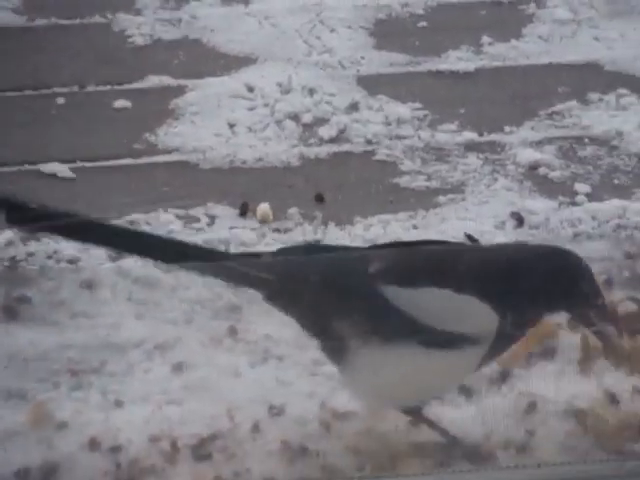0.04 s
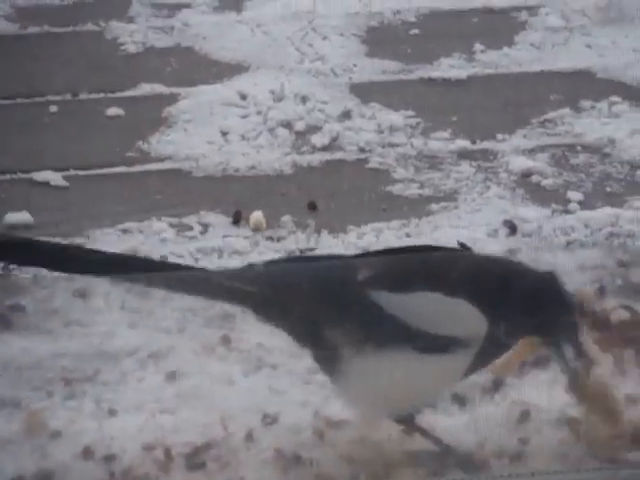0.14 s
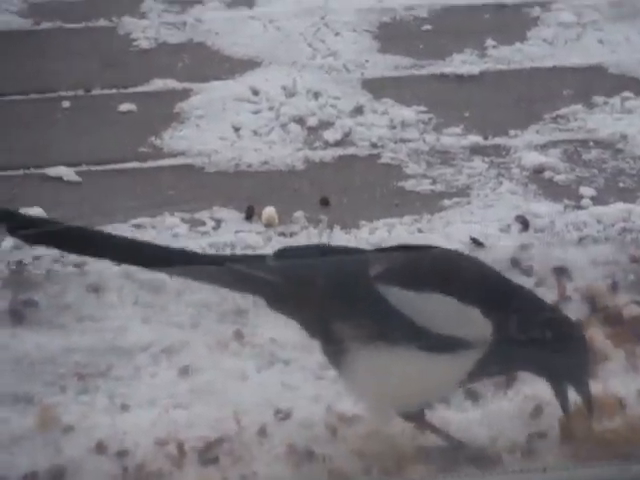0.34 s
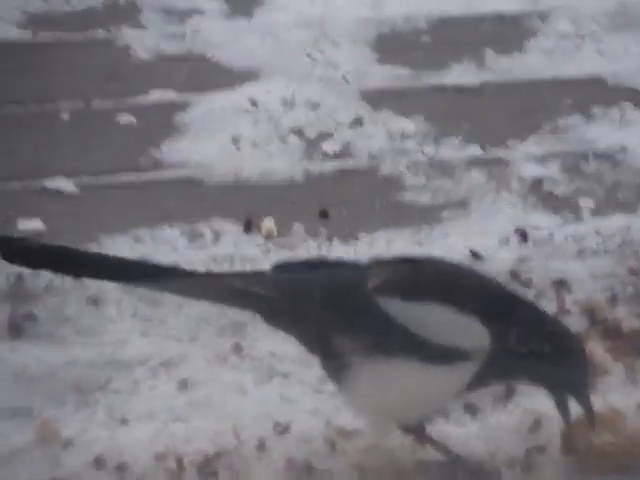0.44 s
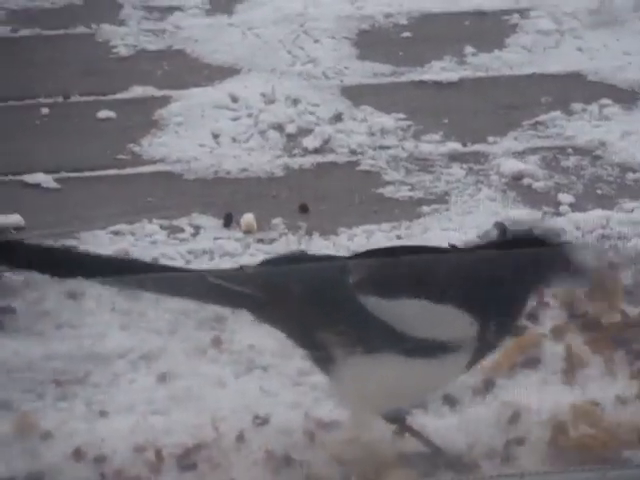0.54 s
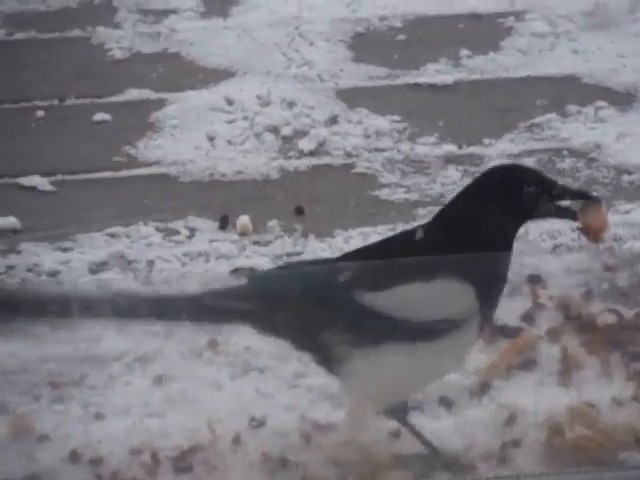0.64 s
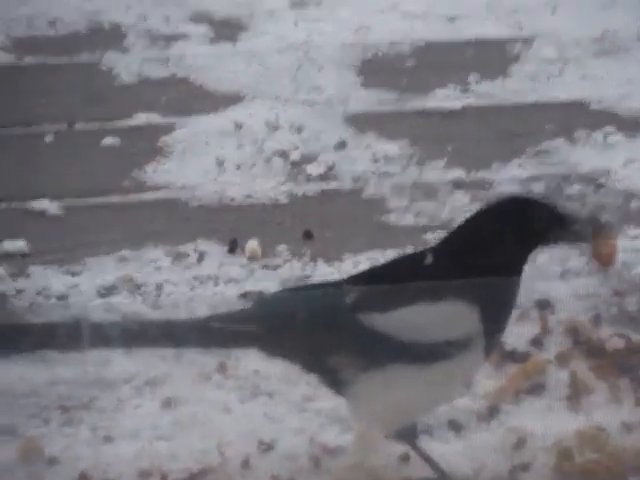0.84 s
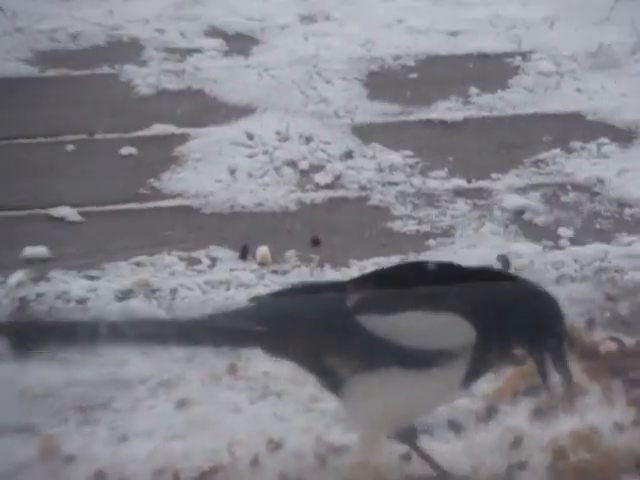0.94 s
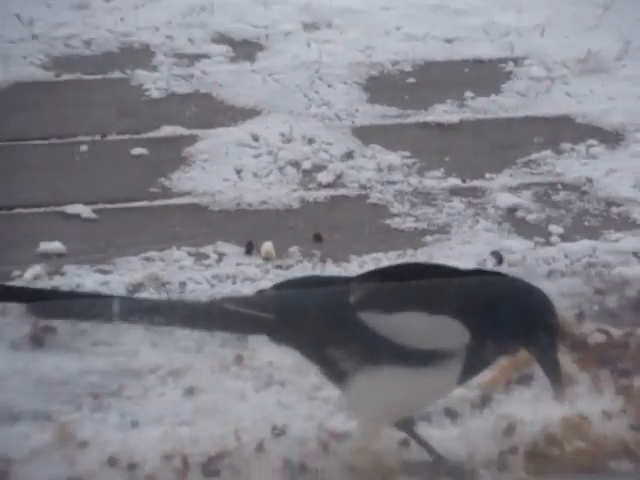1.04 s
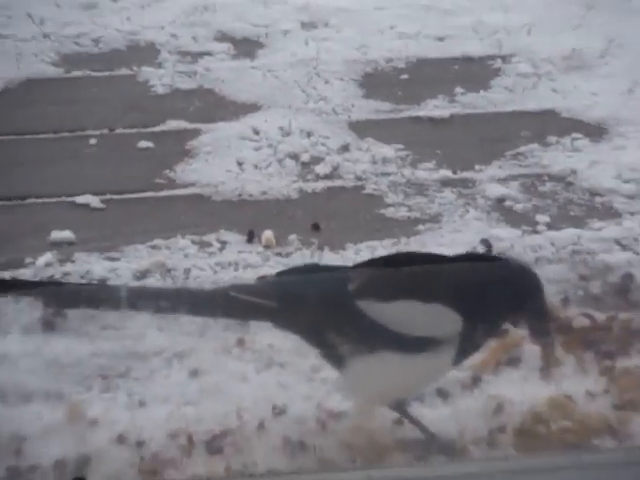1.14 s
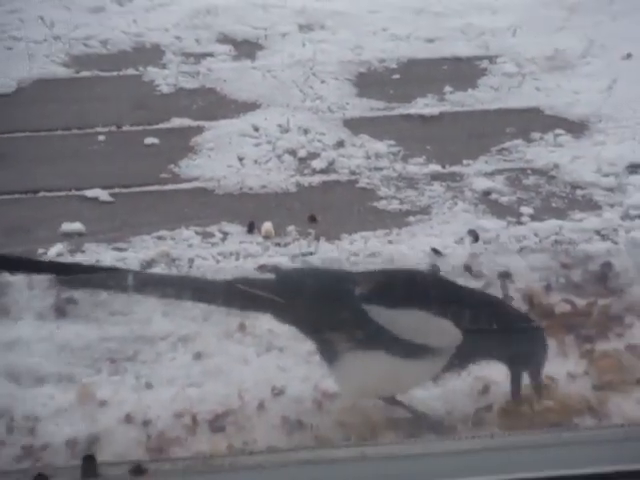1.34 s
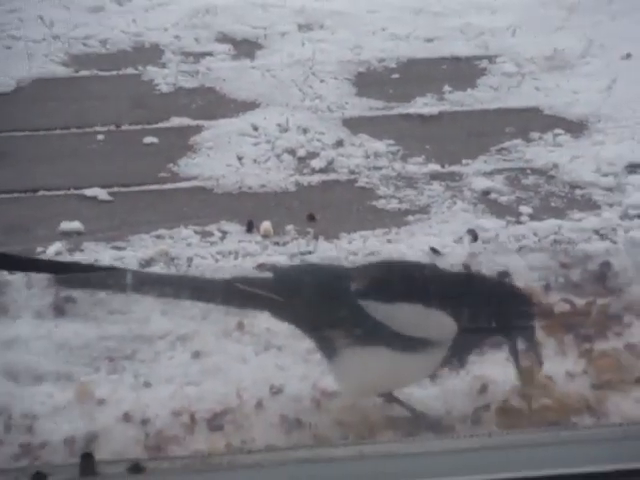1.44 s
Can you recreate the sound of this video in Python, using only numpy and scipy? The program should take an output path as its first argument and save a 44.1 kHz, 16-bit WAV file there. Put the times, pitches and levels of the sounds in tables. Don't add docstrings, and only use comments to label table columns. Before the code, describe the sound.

Sharp bill taps from a feeding magpie, then scratchy pecking, over faint hiss and electronic whine

```python
import sys
import numpy as np
from scipy import signal
from scipy.fft import rfft, irfft, next_fast_len
from scipy.io import wavfile
from scipy.ndimage import uniform_filter1d, map_coordinates

SR = 44100
rng = np.random.default_rng(int(sys.argv[2]) if len(sys.argv) > 2 else 0)


def int16_out(signal):
    q = np.round(np.clip(np.atleast_2d(signal).T, -1, 1) * 32767)
    wavfile.write(sys.argv[1], SR, q.astype(np.int16))


def gain_from_db(level_db):
    decades = np.asarray(level_db, float) / 20
    return 10 ** decades


N = 66150

# (time [s], strength [dB], polarity)
FIRST_TAP = [
    (0.21043, 5.8, -1),
    (0.21143, 6.9, -1),
    (0.21184, 5.0, -1),
]
HARD_TAP = [
    (0.40736, 13.6, -1),
    (0.40774, 9.8, -1),
    (0.40857, 5.0, 1),
    (0.4091, 24.6, -1),
]
LAST_TAP = [
    (1.13831, 1.9, 1),
    (1.13904, -12.2, 1),
    (1.13977, -5.6, 1),
]
# (frequency [Hz], level [dB], T60 [s])
FIRST_TAP_MODES = [(1914, -46.7, 0.0168), (2966, -36.5, 0.0388), (3475, -20.4, 0.0531),
                   (4048, -26.1, 0.0838), (4028, -41.9, 0.0666), (4669, -7.0, 0.0002),
                   (6222, -34.7, 0.0127), (6582, -20.1, 0.0308), (6935, -38.0, 0.0272),
                   (7812, -38.1, 0.0253), (13245, -41.7, 0.0112)]
HARD_TAP_MODES = [(251, -27.6, 0.0165), (435, -18.6, 0.0462), (762, -12.0, 0.0093), (1807, -7.8, 0.0102),
                  (2143, -4.1, 0.0088), (2756, 3.4, 0.0049), (3187, -4.1, 0.014), (4366, 5.3, 0.005),
                  (4945, -3.0, 0.0061), (5474, -0.8, 0.0043), (6629, -5.3, 0.0081), (8353, -1.9, 0.0024)]
LAST_TAP_MODES = [(236, -9.9, 0.0098), (434, -15.7, 0.0552), (661, -5.5, 0.0089), (1281, -8.0, 0.0043),
                  (1776, -9.4, 0.0078), (2316, -1.1, 0.0113), (2764, -15.8, 0.0067), (3116, -30.5, 0.0585),
                  (4367, -14.2, 0.0115), (5322, -21.4, 0.0083), (7157, -17.9, 0.0094),
                  (9957, -29.8, 0.0159), (11344, -21.6, 0.0086)]
MUTE_S = [
    .21365,
    .40975,
    1.1425,
]
MUTE_DB = [
    -26.8,
    -24.4,
    4.6,
]
# (release time [s], level [dB], polarity, rise [s], fall [s])
PUSHES = [
    (.4073, -2.4, 1, .00025, .0002),
    (1.13815, -4.1, -1, .0003, .00015),
]
# (frequency [Hz], level [dB], T60 [s])
HOUSING_MODES = [(430, -11.7, 0.0391), (1819, -14.2, 0.048), (2060, -13.3, 0.037), (2628, -14.7, 0.0484),
                 (2955, -13.2, 0.0241), (3833, -1.8, 0.0147), (4056, -9.8, 0.0462), (4785, -1.5, 0.0366),
                 (4959, -14.2, 0.0768), (5561, -13.1, 0.0366), (6909, -19.7, 0.0376), (9198, -30.5, 0.0687)]
# (time [s], peak level [dB], pitch [Hz],
# side mode level [dB])
TICKS = [(.079, -35, 5870, -15), (.158, -35, 4700, -2), (0.22, -29.5, 5550, -18), (.2843, -41, 3150, 3),
         (0.378, -50, 2030, 5), (0.391, -29, 5840, 8), (0.3945, -29.5, 6540, 2), (0.835, -35, 6300, -9),
         (0.8387, -25, 3210, -13), (0.8382, -27.5, 1700, -24), (0.8382, -25.5, 4900, -20),
         (.839, -28.5, 6600, -18), (.8403, -38, 2170, -7), (0.8423, -27, 5200, -1),
         (0.8536, -27, 1620, -22), (0.8541, -23, 3300, -3), (0.854, -32, 4900, -15),
         (.8638, -26.5, 5350, -26), (.8705, -36, 5800, -15), (0.8738, -25, 3680, -1),
         (0.883, -32, 4400, -19), (0.8883, -31, 4800, 6), (.893, -34, 4360, -10), (.958, -42, 3120, -8),
         (0.9642, -26.5, 3120, -11), (0.965, -31, 5500, -22), (0.9722, -18.5, 4630, 0),
         (0.9709, -29.5, 3100, -19), (.9735, -27.5, 1400, -13), (0.9757, -34, 4280, -27),
         (.9742, -25.5, 3300, -9), (.9742, -29.5, 5830, -18), (.9744, -36, 6640, -6),
         (1.0233, -31.5, 3300, -1), (1.034, -41, 3400, -13), (1.0412, -39, 3280, -11),
         (1.0432, -31, 6100, -3),
         (1.092, -44, 2900, -6), (1.1053, -38, 4460, -15), (1.119, -29, 5400, 1),
              (1.121, -34, 2300, -4), (1.193, -35, 4300, -9), (1.1964, -33.5, 4730, -2),
              (1.204, -37, 5000, -2), (1.211, -36, 5500, -6), (1.2205, -33, 4640, -12),
              (1.2268, -30, 4570, -1), (1.228, -36, 2960, -6), (1.243, -38, 4800, -15),
              (1.255, -41, 4030, -16), (1.2872, -28.5, 3100, -14), (1.2863, -34, 1780, -12),
              (1.3132, -40, 5030, -4), (1.336, -29, 4970, -25), (1.3436, -27, 5340, -13),
              (1.3506, -36, 6050, -9), (1.3548, -29.5, 2140, -3), (1.3566, -26.5, 3650, -4),
              (1.3607, -27, 4700, -10), (1.372, -30.5, 5200, -13), (1.3853, -31.5, 5000, -20),
              (1.4547, -28.5, 5240, -21), (1.463, -38, 5400, -25), (1.47, -39, 5200, -20),
              (1.475, -40, 5260, -8)]
# (start time [s], length [s], level [dB], centre frequency [Hz])
STROKES = [(.0, 0.26, -62, 4800), (0.062, 0.075, -51, 6060), (0.085, 0.058, -57, 2720),
           (0.246, 0.28, -64, 4440), (0.851, 0.046, -42, 5060), (0.885, 0.114, -53, 3500),
           (0.897, 0.076, -50.5, 5550), (0.977, 0.124, -55.5, 6000), (0.838, 0.0054, -42.5, 2360),
           (0.974, 0.0066, -40, 4120), (1.007, 0.082, -55.5, 3520), (1.099, 0.053, -43.5, 4660),
           (1.145, 0.1293, -45, 4740), (1.347, 0.018, -42, 4070), (1.452, 0.025, -52, 5300),
           (1.491, .02, -53.5, 4960), (1.334, .056, -58.5, 5000), (0.839, 0.064, -54, 1190),
           (1.224, 0.014, -51, 1270)]
# (multiple, level [dB])
MOTOR_ORDERS = [(1, -10), (2, 0), (3, -9)]
# (time [s], level [dB])
MOTOR_LEVEL = [
    (.84, -101),
    (.87, -50),
    (.98, -58),
    (1.1, -56.5),
    (1.2, -58),
    (1.268, -66),
    (1.275, -69),
    (1.285, -47.5),
    (1.298, -52.5),
    (1.303, -86),
]
# (time [s], level [dB])
GEAR_LEVEL = [
    (.87, -85),
    (.89, -52),
    (.96, -58),
    (.985, -85),
]
# (frequency [Hz], density [dB per Hz])
HISS_SPECTRUM = [(53, -56.5), (100, -4), (220, -2), (476, -7.5), (1150, -15), (6060, -18.5), (7890, -15),
                 (8610, -21), (15200, -18), (17000, -49)]
RUMBLE_SPECTRUM = [(15, 20.5), (30, 10), (45, 5.5), (62, 6), (90, -18), (200, -49)]
# (time [s], level [dB])
RUMBLE_SWELL = [(0, -7), (.12, -3), (.19, 6), (.35, 3), (.55, -2), (.68, -5.5), (.8, 3), (.95, -3.5),
                (1.2, -5.5), (1.35, 0.5), (1.42, -2.5), (1.5, -2)]


def unit(x):
    return x / np.sqrt(np.mean(x ** 2) + 1e-20)


def filtered(x, response):
    m = next_fast_len(N + 8192)
    return irfft(rfft(x, m) * response(np.fft.rfftfreq(m, 1 / SR)), m)[:N]


def noise(points):
    hz, db = np.transpose(points)

    def response(f):
        return gain_from_db(np.interp(np.log(f + 1), np.log(hz + 1), db, -120, -120))

    return unit(filtered(rng.standard_normal(N), response))


def wobble(rate):
    knots = rng.standard_normal(int(N * rate / SR) + 4)
    return map_coordinates(knots, [np.arange(N) * rate / SR])


def ring(s, modes, rise):
    out, k = np.zeros(N), int(s * SR)
    t = np.clip(np.arange(k, min(N, k + 6000)) / SR - s, 0, None)
    modal_sum = sum(gain_from_db(db - 60 * t / t60) * np.sin(2 * np.pi * hz * t) for hz, db, t60 in modes)
    out[k:k + len(t)] = modal_sum * (1 - np.exp(-t / rise))
    return out


def taps():
    attack_s, mute_fade_s = .00018, .0006
    t, out = np.arange(N) / SR, np.zeros(N)
    contact_sets = (FIRST_TAP, HARD_TAP, LAST_TAP)
    mode_sets = (FIRST_TAP_MODES, HARD_TAP_MODES, LAST_TAP_MODES)
    for contacts, modes, mute_s, mute_db in zip(contact_sets, mode_sets, MUTE_S, MUTE_DB):
        ringing = sum(sign * gain_from_db(db) * ring(s, modes, attack_s) for s, db, sign in contacts)
        muted = np.clip((t - mute_s) / mute_fade_s + .5, 0, 1)
        out += gain_from_db(mute_db * muted) * ringing
    return out


def pushes():
    t, out = np.arange(N) / SR, np.zeros(N)
    for s, db, sign, rise, fall in PUSHES:
        out += sign * gain_from_db(db) * np.exp(-np.maximum((s - t) / rise, (t - s) / fall))
    return out


def housing():
    return gain_from_db(-16.8) * ring(.4095, HOUSING_MODES, 0.00021)


def ticks():
    t60_s, rise_s, low_hz, high_hz = .0045, .0003, 1300, 6900
    out = np.zeros(N)
    for s, db, hz, side_db in TICKS:
        r = rng.standard_normal(16)
        side_hz = np.linspace(low_hz, high_hz, num=7) * np.exp(0.08 * r[:7])
        side_level = np.clip(side_db, -30, 6) - 7.0
        delays = 0.001175 * rng.random(7)
        tick = ring(s, [(hz, 0, t60_s)], rise_s)
        for f, v, delay, polarity in zip(side_hz, r[7:], delays, r):
            mode = (f, side_level + 0.95 * v, 0.71 * t60_s)
            tick += np.sign(polarity) * ring(s + delay, [mode], rise_s)
        out += gain_from_db(db) * tick / abs(tick).max()
    return out


def grains(hz):
    grains_per_s, pitch_spread, decay_cycles = 1400, 0.221, 3.9
    size_db, clump_db, cap_db = 1, 2, 9
    r, k = rng.random((grains_per_s * N // SR, 3)), np.arange(128)
    start = (r[:, 0] * N).astype(int)
    pitch = hz * np.exp(pitch_spread * rng.standard_normal(len(r)))
    cycles = pitch[:, None] * k / SR
    size = np.minimum(-size_db * np.log(1 - r[:, 1]) + clump_db * wobble(130)[start], cap_db)
    shape = gain_from_db(size)[:, None] * np.sin(2 * np.pi * cycles) * cycles * np.exp(-2 * cycles / decay_cycles)
    return unit(np.bincount((start[:, None] + k).ravel(), shape.ravel(), N)[:N])


def scratches():
    edge_s, q, smooth_share, top_hz = 0.0095, 1.64, .4, 8000
    t, out = np.arange(N) / SR, np.zeros(N)
    for s, length, db, hz in STROKES:
        live = np.clip(np.minimum(t - s, s + length - t) / edge_s + .5, 0, 1)
        width = hz / q

        def resonance(f):
            return (1j * f * width / (hz * hz - f * f + 1j * f * width)) ** 2

        hiss = unit(filtered(rng.standard_normal(N), resonance))
        rub = smooth_share * hiss + (1 - smooth_share) * grains(hz)
        out += gain_from_db(db) * live * rub / np.sqrt(np.average(rub ** 2, weights=live + 1e-9))
    return filtered(out, lambda f: 1 / (1 + (f / top_hz) ** 8))


def room(x):
    t60_s = .06
    t = np.arange(SR // 4) / SR
    colour = [(300, -13), (1500, -37), (5500, -1), (9000, -10)]  # (Hz, dB)
    tail = noise(colour)[:len(t)] * gain_from_db(-60 * t / t60_s)
    return signal.fftconvolve(x, tail / np.linalg.norm(tail))[:N]


def motor():
    step_hz = 2222.6
    t = np.arange(N) / SR
    phase = 2 * np.pi * step_hz * t + .3 * wobble(80)
    level_db = np.interp(t, *np.transpose(MOTOR_LEVEL)) + 1.5 * wobble(49.9)
    return gain_from_db(level_db) * sum(np.sqrt(2) * gain_from_db(db) * np.sin(k * phase) for k, db in MOTOR_ORDERS)


def gear():
    mesh_hz = 5860
    t = np.arange(N) / SR
    level_db = np.interp(t, *np.transpose(GEAR_LEVEL)) + 2.5 * wobble(73)
    return gain_from_db(level_db) * np.sin(2 * np.pi * mesh_hz * t + .6 * wobble(70))


def whine():
    line_hz, lines_a_frame, field_start_s, weak_from = 7867.13, 262, .0213, .503
    strong_db, weak_db, weak_turn_rad, slip_s = -48.9, -4.2, 2.4, .0007
    blank_s, blank_db = .0014, -5
    t, frame_s = np.arange(N) / SR, lines_a_frame / line_hz
    into = (t - field_start_s) % frame_s
    weak = into - weak_from * frame_s
    gain = np.where(weak < 0, 1, gain_from_db(weak_db + blank_db * (weak < blank_s)))
    slip = weak_turn_rad * np.clip(weak / slip_s, 0, 1)
    slip += (2 * np.pi - weak_turn_rad) * (np.clip(into / slip_s, 0, 1) - 1)
    return gain_from_db(strong_db) * uniform_filter1d(gain, size=15) * np.sin(2 * np.pi * line_hz * t - slip)


def clock():
    t = np.arange(N) / SR
    return gain_from_db(-64 + 1.5 * wobble(28)) * np.sin(2 * np.pi * 1117 * t + 0.48 * wobble(25.3))


def hiss():
    level_db, duck_s, depth_db, recover_s = -52, 0.46, -4.5, 0.047
    t = np.arange(N) / SR
    duck_db = depth_db * (t > duck_s) * np.exp(-abs(t - duck_s) / recover_s)
    return gain_from_db(level_db + duck_db + 0.34 * wobble(2.4)) * noise(HISS_SPECTRUM)


def rumble():
    level_db, swing_db = -43.5, 3.5
    swell_db = np.interp(np.arange(N) / SR, *np.transpose(RUMBLE_SWELL))
    return gain_from_db(level_db + swell_db + swing_db * wobble(3.5)) * noise(RUMBLE_SPECTRUM)


def scene():
    impacts = taps() + pushes() + ticks() + housing()
    reflected = gain_from_db(-46) * room(np.clip(impacts, -1, 1))
    machinery = motor() + gear() + whine() + clock()
    return (impacts + reflected + scratches() + machinery + hiss() + rumble())[None]


def input_response(f):
    low_cut_hz, dull_hz, top_hz = 60, 13000, 16200
    s = 1j * f / low_cut_hz
    low_cut = s * s / (s * s + np.sqrt(2) * s + 1)
    return low_cut * np.clip((top_hz - f) / 1400 + .5, 0, 1) / np.sqrt(1 + (f / dull_hz) ** 2)


def roll_off(x):
    return signal.sosfilt(signal.butter(12, 17140, fs=SR, output="sos"), x)


def record(dry):
    ceiling, knee = .74, 5
    clipped = dry / (1 + abs(dry / ceiling) ** knee) ** (1 / knee)
    mix = filtered(clipped[0], input_response)[None]
    return roll_off(mix)


dry = scene()
out = record(dry)
int16_out(out)
```